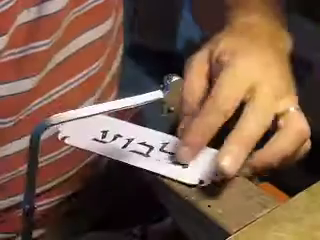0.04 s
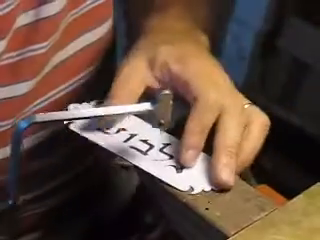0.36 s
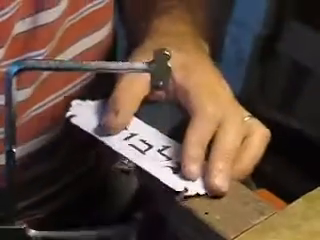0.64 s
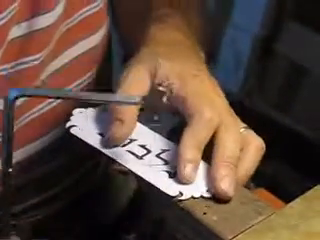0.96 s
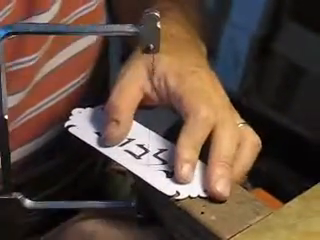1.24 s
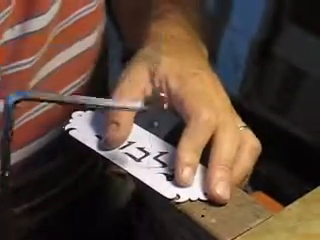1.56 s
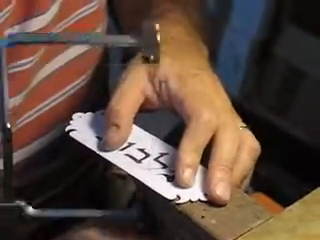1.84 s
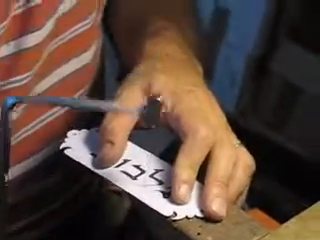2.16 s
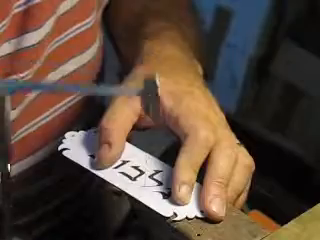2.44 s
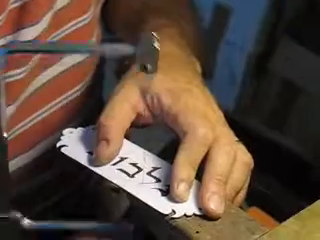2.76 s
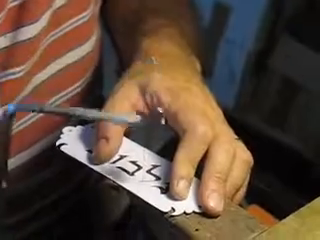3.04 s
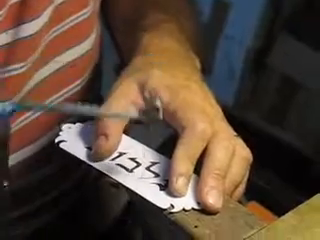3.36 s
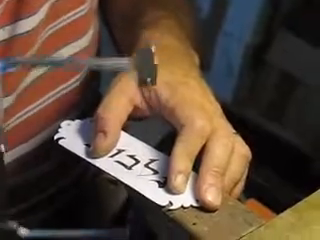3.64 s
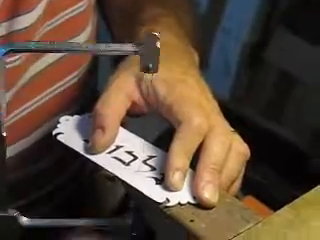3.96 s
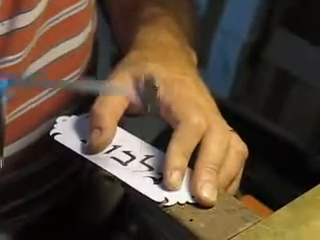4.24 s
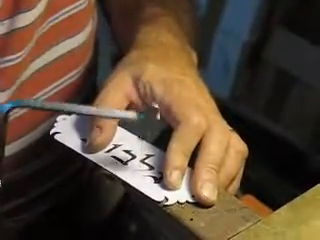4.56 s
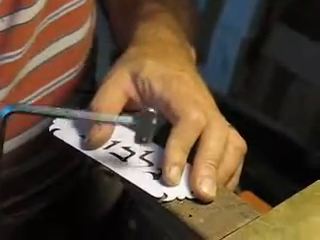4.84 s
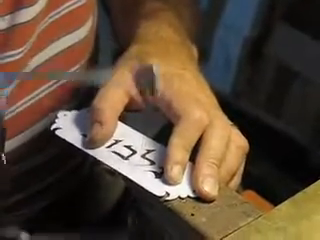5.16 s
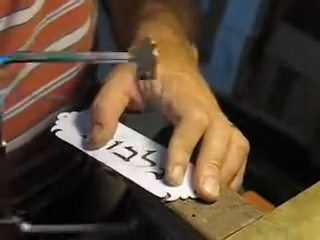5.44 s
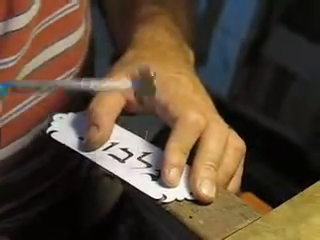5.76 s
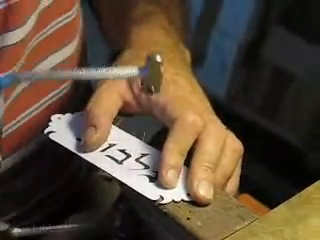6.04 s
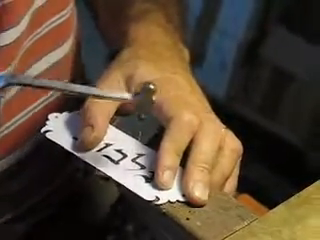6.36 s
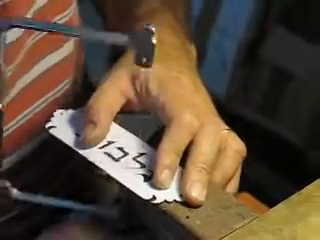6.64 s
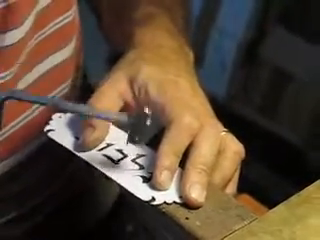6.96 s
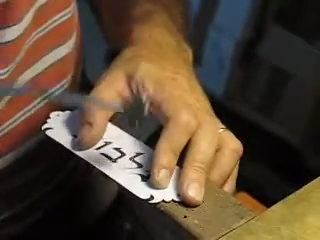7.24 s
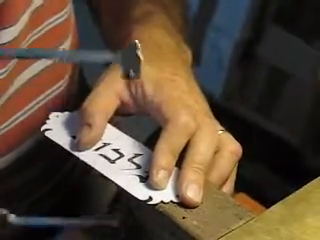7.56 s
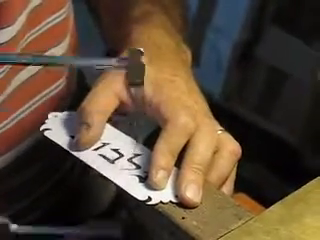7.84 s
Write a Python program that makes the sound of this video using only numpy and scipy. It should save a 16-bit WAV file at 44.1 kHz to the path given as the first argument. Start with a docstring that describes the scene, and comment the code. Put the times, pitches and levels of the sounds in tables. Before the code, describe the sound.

A fine hand saw cuts a thin metal plate held on a wooden bench. After a few short scrapes and a sharp tick, it settles into quick back-and-forth strokes that rasp, hiss and whine, each swooping up and down in pitch. The blade snags now and then, and the plate thuds on the wood. The sawing falters briefly, then resumes. A small camera microphone picks up a short workshop echo and steady hiss.

```python
"""A jeweller's saw works through a thin metal plate that a hand holds on a wooden bench peg.
After a few short scrapes the strokes run at about five a second, the tooth rate swooping up and down
in each. The teeth rasp, hiss and whine through the plate, and now and then snag. Dragged by the blade,
the plate bumps the peg and sometimes rings on. A short workshop echo and a steady hiss lie behind it,
all heard through a small camera with a limiter and a low sample rate."""
import sys
import numpy as np
from scipy import signal
from scipy.fft import rfft, irfft, next_fast_len
from scipy.io import wavfile
from scipy.ndimage import uniform_filter1d, minimum_filter1d, map_coordinates

SR = 44100
rng = np.random.default_rng(int(sys.argv[2]) if len(sys.argv) > 2 else 0)


def put_to_file(sound):
    """Save the sound as 16-bit audio at rate SR, in the file named by the first command-line argument."""
    columns = np.atleast_2d(sound).T  # one column per channel
    safe = np.clip(columns, -1, 1)
    whole_steps = np.round(safe * 32767)
    wavfile.write(sys.argv[1], SR, whole_steps.astype(np.int16))


N = 356769
TIME = np.arange(N) / SR
BAND_HZ = 5500  # top of the camera's true bandwidth
BRISK_RATE_HZ = 1510  # teeth per second in a brisk stroke


def amp(db):
    """Decibels to gain."""
    return 10 ** (np.asarray(db) / 20)


def unit(x):
    """Scale to rms 1."""
    return x / np.sqrt(np.mean(np.abs(x) ** 2) + 1e-20)


def along(points, hz):
    """Read a curve of (freq_hz, value) points on a log frequency axis."""
    freqs, values = np.transpose(points)
    return np.interp(np.log(hz + 1), np.log(freqs + 1), values)


def wobble(rate_hz):
    """A smooth random curve with rate_hz knots a second."""
    knots = rng.standard_normal(int(N * rate_hz / SR) + 4)
    return unit(map_coordinates(knots, [TIME * rate_hz], order=2))


def add(track, start_s, sound):
    """Mix a sound into a track."""
    part = track[max(round(start_s * SR), 0):][:len(sound)]
    part += sound[:len(part)]


def low_pass(x, hz):
    """Remove everything above hz."""
    size = next_fast_len(N + 8192)
    return irfft(rfft(x, size) * (np.fft.rfftfreq(size, 1 / SR) < hz), size)[:N]


def coloured(x, db_of_hz, size=8192):
    """Minimum-phase EQ with the given dB curve, cut at BAND_HZ; white noise keeps its level."""
    hz = np.fft.rfftfreq(size, 1 / SR)
    gain = unit(amp(db_of_hz(hz)) / np.sqrt(1 + (hz / BAND_HZ) ** 60))
    cepstrum = irfft(np.log(np.maximum(gain, 1e-5)))
    cepstrum[1:size // 2] *= 2
    cepstrum[size // 2 + 1:] = 0
    return signal.fftconvolve(x, irfft(np.exp(rfft(cepstrum))))[:N]


# Tone of the background: freq_hz, gain_db
BACKGROUND_EQ = [(20, -9.5), (60, -8.5), (90, -7), (220, 2), (400, -3.5), (1000, -11), (2200, -13.5),
                 (5500, -15)]
def background_hiss():
    """A steady bed of noise, fullest in the low mids."""
    return coloured(rng.standard_normal(N), lambda hz: along(BACKGROUND_EQ, hz))


# Down strokes, which cut: start_s, length_s, top_rate_hz, level_db, whine_offset_db
DOWN_STROKES = [(0.385, .12, 270, -35.5, 2), (0.951, .135, 600, -23.5, -8), (1.451, 0.27, 690, -23.5, -4),
                (1.973, .22, 712, -25, -2), (2.513, .18, 926, -23, -1.5), (2.966, 0.15, 1340, -24.5, 3),
                (3.375, 0.15, 1410, -25, 2), (3.768, .14, 1570, -25.5, 3), (4.148, 0.14, 1570, -24.5, 2.5),
                (4.511, .14, 1640, -25, 2.5), (4.879, 0.13, 1590, -25, 3), (5.237, 0.14, 1650, -21.5, 2),
                (5.611, .135, 1500, -24, 2), (6.107, .08, 400, -26.5, -1), (6.252, 0.15, 670, -24.5, -4),
                (6.875, 0.17, 1430, -23, -1), (7.272, 0.15, 1590, -24.5, 2), (7.645, 0.14, 1670, -22.5, 2),
                (8.013, .145, 1400, -22, -4.5)]
# Up strokes, which scrape and only sometimes sing: same columns
UP_STROKES = [(0.169, 0.05, 293, -35.5, -15), (0.609, .19, 300, -29.5, -7), (1.065, 0.21, 550, -29.5, -30),
              (1.71, .19, 1000, -25, -22), (2.244, .19, 1150, -22.5, -8.5), (2.733, .16, 1350, -24, -11),
              (3.159, .17, 1350, -26, -8), (3.557, 0.17, 1550, -22.5, -12), (3.94, 0.16, 1440, -22, -3.5),
              (4.32, 0.17, 1450, -22.5, -7), (4.677, 0.16, 1400, -22.5, -9), (5.046, 0.16, 1650, -21.5, -1),
              (5.404, .145, 1470, -21, -6), (5.873, .12, 880, -26.5, -6.5), (6.591, 0.13, 450, -29.5, -17),
              (6.705, 0.081, 410, -28, -25), (7.055, 0.19, 1170, -22.5, -2.5), (7.456, 0.18, 1450, -24, -6),
              (7.808, 0.19, 1410, -24, -3)]
def strokes():
    """Every stroke of the arm, with its direction appended: 1 down, -1 up."""
    return [(*row, 1) for row in DOWN_STROKES] + [(*row, -1) for row in UP_STROKES]


def arm(fastest_at=.47, sing_at=.38, sing_rise=.05):
    """The arm's swing: signed tooth rate, travel (-1 top, 1 bottom) and rasp, hiss and whine envelopes."""
    rate_hz, rasp, hiss, whine = np.zeros((4, N))
    turns = []
    for start, length, top_hz, db, whine_db, direction in strokes():
        end = start + length
        now = slice(int(start * SR) + 1, int(end * SR))
        progress = np.interp(TIME[now], [start, start + fastest_at * length, end], [0, .5, 1])
        speed = np.abs(np.sin(np.pi * progress))  # like a pendulum
        brisk = top_hz * speed / BRISK_RATE_HZ
        force = amp(db) * speed ** .96
        ease_db = -10.5 if direction > 0 else -1  # pressure eases off across the stroke
        rate_hz[now] = direction * top_hz * speed
        rasp[now] = force * amp(ease_db * (progress - .5))
        hiss[now] = rasp[now] * amp(-2.5) * brisk ** .5
        unsettled = (1 - np.tanh((progress - sing_at) / sing_rise)) / 2  # until the teeth settle into song
        whine[now] = force * amp(whine_db - 9 * unsettled) * brisk ** .5
        turns += [(start, -direction), (end, direction)]
    travel = np.interp(TIME, *np.transpose(sorted(turns)))
    return rate_hz, travel, rasp, hiss, whine


def chips(rate_hz, spread_db):
    """Tiny fractures at random moments, of scattered size."""
    cracks = (rng.random(N) < rate_hz / SR) * rng.standard_normal(N)
    return unit(cracks * amp(-spread_db * rng.standard_normal(N).clip(-2, 2)))


# Tone of the saw's three layers: freq_hz, gain_db
WHINE_EQ = [(200, 0), (750, 2.5), (1400, -4), (3000, -3), (5500, 7.5)]
RASP_EQ = [(40, -29), (110, 1), (220, 7), (450, -2.5), (800, 1.5), (1500, -3.5), (2100, -4.5), (3000, -20),
           (5500, -32)]
HISS_EQ = [(500, -32.5), (1500, 1.5), (2300, 2.5), (2800, 1.5), (3400, 0), (4200, 0.5), (5500, 9.5)]
def saw():
    """Teeth strike the edge of the cut and tear off chips; plate, frame and blade ring with them."""
    rate_hz, travel, rasp, hiss, whine = arm()
    uneven = .5 * wobble(330)  # teeth catch early or late
    waver = 1 + .025 * wobble(90)  # the hand is not quite steady
    phase = 2 * np.pi * np.cumsum(np.abs(rate_hz) * waver) / SR + uneven
    grip = unit(amp(2.16 * wobble(320) + 1.87 * wobble(65)))  # the bite varies from tooth to tooth
    contact = unit(np.exp(.77 * np.cos(phase)))  # friction comes once per tooth
    flutter = unit(amp(3.1 * wobble(280) + 1.23 * wobble(70)))
    teeth = whine * flutter * (np.sin(phase) + amp(-14.5) * np.sin(2 * phase))
    chatter = snags()
    coarse = rasp * grip * contact * chips(rate_hz=6000, spread_db=1.5) * amp(-1.5) + chatter * amp(2.5)
    fine = hiss * grip * contact * chips(rate_hz=14000, spread_db=1) + chatter * amp(-7)
    return (amp(2) * through_plate(teeth, WHINE_EQ)
            + through_plate(coarse, RASP_EQ)
            + amp(.5) * through_plate(fine, HISS_EQ)
            + amp(-2.5) * blade_ring(fine, rate_hz, travel))


# Resonances of plate and saw frame: pitch_hz, width_hz, early_lift_db, late_lift_db
PLATE_MODES = [(220.5, 45, 14, 12), (350, 26, 7.5, 1), (390.3, 14, 12.5, 16), (493, 25, 11.5, 8),
               (617.5, 14, 13.5, 15), (707, 73, 13.5, 12), (766.4, 18, 12.5, 13.5), (936, 71, 13, 4),
               (1136, 23, 13, 13), (1385.5, 43, 18.5, 10), (1435, 52, 13, 8), (1545, 55, -14, 15.5),
               (1652, 215, 11.5, -0.5), (1898, 28, 8, 10), (1950, 23, 18.5, 5), (2469, 40, 15, 21),
               (2660, 86, 21.5, 16), (3071, 47, 16, -59), (3270, 54, -9, 3), (3336, 33, 9, 15.5),
               (3663, 210, 9.5, 13.5), (4235, 98, 7.5, 14), (4530, 64, 9.5, 12), (4830, 40, 10.5, 12),
               (5700, 430, -15, 7.5)]
def through_plate(force, eq, early_s=2.5, late_s=7.5):
    """Colour a force by its EQ and by the plate, whose resonances shift in strength as the hand's grip on it
    changes."""
    pitch_hz, width_hz, early_db, late_db = np.transpose(PLATE_MODES)[:, :, None]

    def response(lift_db):
        def curve_db(hz):
            peaks = amp(lift_db) ** 2 / (1 + (2 * (hz - pitch_hz) / width_hz) ** 2)
            return along(eq, hz) + 10 * np.log10(.5 + peaks.sum(0))
        return coloured(force, curve_db)
    regrip = np.interp(TIME, [early_s, late_s], [0, 1])
    return (1 - regrip) * response(early_db) + regrip * response(late_db)


def blade_ring(force, rate_hz, travel, width_hz=67):
    """The taut blade rings lower near the top of its travel, and lower and freer on the slack return."""
    pull = np.tanh(rate_hz / 400)
    drive = force * amp(-2 * pull)
    pitch_hz = 2745 + 110 * travel + 70 * pull
    carrier = np.exp(2j * np.pi * np.cumsum(pitch_hz) / SR)
    pole = np.exp(-np.pi * width_hz / SR)
    envelope = signal.lfilter([np.sqrt(2 * (1 - pole ** 2))], [1, -pole], drive / carrier)
    return (envelope * carrier).real


def stroke_knocks(count=3, grip_at=.0206, release_at=.86):
    """Light knocks (start_s, level_db) in each stroke: as the blade grips, at random, and as it lets go."""
    knocks = []
    for start, length, top_hz, db, _, direction in strokes():
        # quick strokes and up strokes shake the plate less
        shake_db = db - 1.5 * np.log2(top_hz / BRISK_RATE_HZ) - (3.5 if direction < 0 else 0)
        spacing = (np.arange(count) + .5 + rng.random(count)) / (count + 1)
        rattle_at = grip_at + (release_at - grip_at) * spacing
        rattle_db = 2.5 + 2.5 * rng.standard_normal(count)
        for share, lift_db in [(grip_at, 3), *zip(rattle_at, rattle_db), (release_at, 4.5)]:
            knocks.append((start + share * length, shake_db + lift_db))
    return knocks


# Hard slaps of the plate on the peg: start_s, level_db
HARD_KNOCKS = [(.411, -20), (.46, -16.5), (.691, -13), (.872, -20.5), (1.05, -16), (1.222, -15),
               (1.462, -10), (1.655, -9), (2.017, -15.5), (2.175, -13), (2.539, -7), (3.083, -13),
               (3.372, -12), (3.506, -12.5), (4.34, -14), (4.535, -19), (4.794, -16.5), (4.865, -16.5),
               (5.351, -12.5), (5.395, -21), (5.625, -16.5), (5.947, -11.5), (6.122, -16), (6.318, -21),
               (6.616, -11), (6.745, -23), (6.872, -19), (7.015, -15), (7.383, -15.5), (7.605, -15.5),
               (7.777, -17.5)]
# Wooden body of the peg: pitch_hz, level_db, t60_s
PEG_MODES = [(114.5, -19.5, 0.078), (152.8, -15, 0.089), (201.2, -4.5, 0.12), (231.2, -2, 0.12),
             (260, -5, 0.042), (338, -17, 0.091), (403.6, -20, 0.15), (780, -6.5, 0.047)]
def peg_bumps(rise_s=.008, delay_s=.007, detune=.044, scatter_db=4):
    """The plate thuds on the peg; the fingers damp each knock a little differently."""
    track, t = np.zeros(N), np.arange(-SR // 32, SR // 4) / SR
    hz, mode_db, t60 = np.transpose(PEG_MODES)[:, :, None]
    swell = 1 + np.tanh((t - delay_s) / rise_s)  # the load builds over a few cycles
    for start, db in HARD_KNOCKS + stroke_knocks():
        pitch, size = rng.standard_normal((2, len(PEG_MODES), 1))
        decay = amp(mode_db + scatter_db * size - 60 * t.clip(0) / t60)
        modes = decay * np.sin(2 * np.pi * hz * (1 + detune * pitch) * (t - delay_s))
        knock = modes.sum(0) * swell
        add(track, start + t[0], amp(db) * knock / np.abs(knock).max())
    return track


# Decay of the workshop: freq_hz, t60_s
ROOM_DECAY = [(150, 0.75), (1000, 0.48), (5000, 0.57)]
def workshop_echo(x, predelay_samples=300):
    """Reflections blur into a short, noisy tail."""
    hz, t, noise = signal.stft(rng.standard_normal(SR // 2), SR, nperseg=256)
    decay = amp(-60 * t / along(ROOM_DECAY, hz)[:, None])
    tail = signal.istft(noise * decay, SR, nperseg=256)[1]
    return signal.fftconvolve(x, np.pad(tail, (predelay_samples, 0)) / np.linalg.norm(tail))[:N]


# Sharp ticks as the blade is set: start_s, level_db
BLADE_TICKS = [(0.496, -7), (0.4968, -14), (.4988, -22)]
# Steely ring of each tick: pitch_hz, level_db, t60_s
STEEL_MODES = [(3020, -2.5, .012), (3270, -8, 0.0054), (3720, -9, 0.017), (1900, -7, 0.0071),
               (5100, -15, .005)]
def blade_ticks():
    """The steel blade clicks against the plate."""
    track, t = np.zeros(N), np.arange(SR // 20) / SR
    for start, db in BLADE_TICKS:
        for hz, mode_db, t60 in STEEL_MODES:
            decay = amp(db + mode_db - 60 * t / t60)
            add(track, start, decay * np.sin(2 * np.pi * (hz * t + rng.random())))
    return track


# The blade catches in the cut: start_s, length_s, level_db
BLADE_SNAGS = [(0.697, 0.012, -21), (0.863, 0.028, -38), (1.204, .046, -21.5), (1.456, 0.031, -22),
               (1.815, .048, -16), (1.992, 0.029, -23.5), (2.362, 0.031, -22.5), (2.517, 0.036, -17.5),
               (2.839, 0.04, -19), (2.98, .024, -23.5), (3.28, 0.046, -20), (3.365, .026, -24),
               (4.52, 0.026, -16.5), (5.947, 0.036, -22), (6.116, .02, -24), (6.303, 0.026, -18),
               (6.481, 0.0067, -31.5), (6.612, 0.016, -22), (7.279, 0.026, -22.5)]
def snags():
    """Bursts of coarse chatter where the teeth dig in."""
    force = np.zeros(N)
    for start, length, db in BLADE_SNAGS:
        add(force, start, amp(db) * signal.windows.tukey(int(length * SR), .6))
    return force * chips(rate_hz=3300, spread_db=1.5)


# Lingering notes of the plate: start_s, pitch_hz, t60_s, level_db
PLATE_RINGS = [(0.729, 332, 0.47, -29), (1.255, 394, 0.31, -22), (3.37, 321, 0.24, -18)]
def plate_rings():
    """Where the fingers hold it loosely, the plate rings on after a jolt."""
    track = np.zeros(N)
    for start, hz, t60, db in PLATE_RINGS:
        t = (TIME - start).clip(0)
        track += amp(db - 60 * t / t60) * np.sin(2 * np.pi * hz * t)
    return track


def scene():
    """Saw, plate and peg in the workshop, over a steady hiss."""
    cutting = saw()
    knocks = amp(4.5) * peg_bumps()
    echo = workshop_echo(amp(-7.5) * cutting + amp(-8) * knocks)
    background = amp(-39) * background_hiss()
    return (cutting + knocks + plate_rings() + amp(1) * blade_ticks() + echo + background)[None]


def limiter(x, ceiling_db, window=400):
    """Turn the gain down around peaks that pass the ceiling."""
    needed = np.minimum(1, amp(ceiling_db) / (np.abs(x) + 1e-9))
    return x * uniform_filter1d(minimum_filter1d(needed, window), window)


def record(dry, hold_samples=4, silent_until_s=.163):
    """The camera limits peaks and holds each sample, which mirrors the sound into the treble."""
    limited = limiter(low_pass(dry[0], BAND_HZ), ceiling_db=-8.3)
    gated = limited * (TIME > silent_until_s)
    held = np.repeat(gated[::hold_samples], hold_samples)[:N]
    return low_pass(held, hz=12900)[None]


dry = scene()
out = record(dry)
put_to_file(out)
```